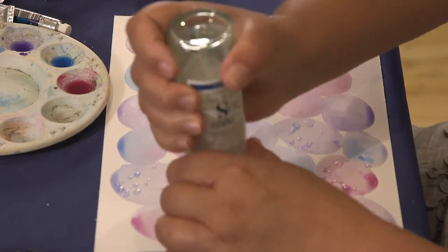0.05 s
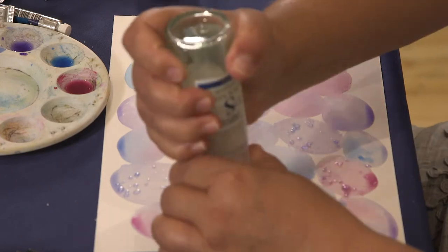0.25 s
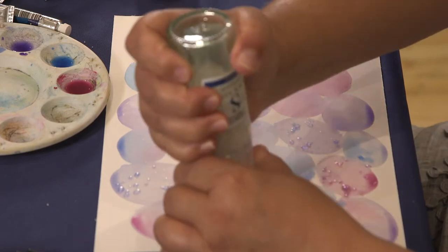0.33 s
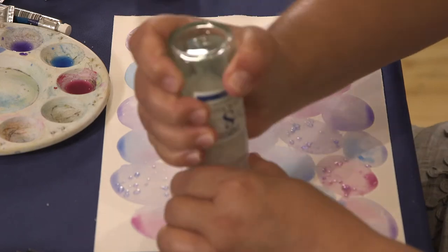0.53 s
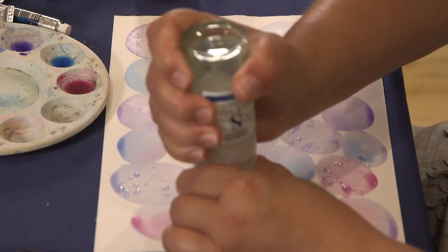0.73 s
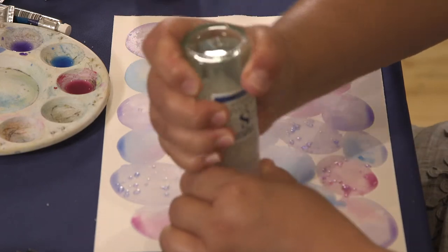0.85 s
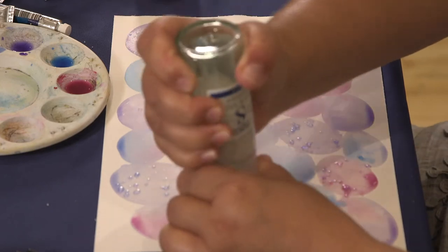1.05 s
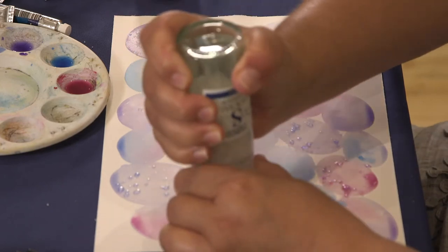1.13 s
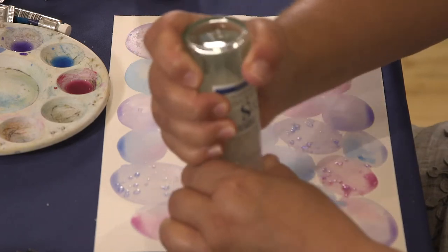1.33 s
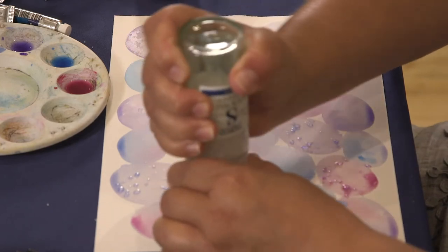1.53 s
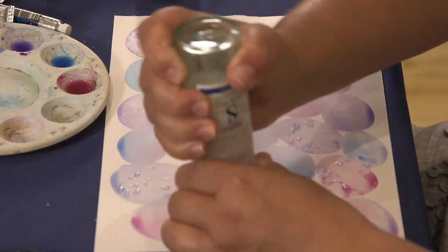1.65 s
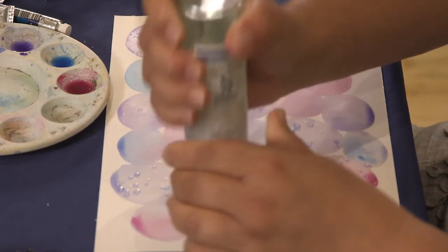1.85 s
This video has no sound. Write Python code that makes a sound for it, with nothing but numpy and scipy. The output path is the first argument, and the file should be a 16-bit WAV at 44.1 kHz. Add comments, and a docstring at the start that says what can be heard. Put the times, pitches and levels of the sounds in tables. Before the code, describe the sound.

Coarse salt snaps and crunches in a hand grinder, turn after turn, with gritty rubbing between the bursts and a light patter of falling grains, heard very close in a small indoor room.

```python
"""Salt crystals crack between the burrs of a mill in five bunches, close to the microphone in a small room.
Each crack is a noise burst ringing the mill, with a low thump made from a high-passed pressure step.
The burrs creak (uneven pulse trains), scrape and rub (swells and a bed of coloured grains).
Crushed salt hisses down onto paper as more coloured grains; a diffuse echo and a quiet floor lie behind."""
import sys
import numpy as np
from scipy import signal
from scipy.fft import rfft, irfft
from scipy.io import wavfile

SR = 44100
rng = np.random.default_rng(int(sys.argv[2]) if len(sys.argv) > 2 else 0)


def digitize_waveform(pressure):
    """Quantize a signal to 16-bit integers and store it at the path in sys.argv[1].

    Rows of a 2-D input are taken as channels; values are limited to [-1, 1].
    """
    field = np.atleast_2d(pressure).T
    bounded = np.clip(field, -1, 1)
    quanta = np.round(bounded * 32767).astype(np.int16)
    wavfile.write(sys.argv[1], SR, quanta)


N = 83790


def amp(db):
    """Amplitude ratio of a level in dB."""
    return 10 ** (np.asarray(db) / 20)


def unit(x):
    """Scale to an RMS of 1."""
    return x / np.sqrt(np.mean(x ** 2) + 1e-20)


def read(points, hz):
    """Interpolate a spectral table on a log-frequency axis."""
    f, value = np.transpose(points)
    return np.interp(np.log(hz + 1), np.log(f + 1), value)


def add(mix, start_s, sound):
    """Mix a sound in at its start time, cut at the end of the mix."""
    part = mix[max(round(start_s * SR), 0):][:len(sound)]
    part += sound[:len(part)]


def colour(x, gain_db, size=2048):
    """Causal minimum-phase filter whose gain in dB is a function of frequency."""
    hz = abs(np.fft.fftfreq(size, 1 / SR))
    log_gain = gain_db(hz) * np.log(10) / 20
    taps = np.fft.ifft(np.exp(np.conj(signal.hilbert(log_gain)))).real
    return signal.fftconvolve(x, taps)[:len(x)]


# Resonances of the mill. Each row: centre in Hz, full width at half the lift in Hz, lift in dB.
MILL_RESONANCES = [(2690, 900, 3), (4800, 900, 3), (8200, 900, 4), (10200, 900, 4), (12750, 1000, 6),
                   (15300, 700, 3)]
RING_LIFT_DB, RING_WIDTH_HZ = 9, 2200
FIRST_BREAK = 3.5  # height of the opening click, against noise of RMS 1
SNAP_DECAY_SHARE = 0.2  # decay time as a share of the fracture length
AFTER_DB, AFTER_DECAY_S = -17, 0.0025
TREBLE_FALL_DB_PER_KHZ = -0.08
DULL_FALL_PER_KHZ = 0.041  # extra fall per dB that the middle exceeds the treble
LEVEL_WINDOW_S = 0.0023  # band levels are RMS, with all the energy counted in this window
SNAP_BANDS_HZ = [(200, 1350), (1700, 6800), (6800, 16000)]
SNAP_FILTERS = [signal.butter(3, hz, "bandpass", fs=SR, output="sos") for hz in SNAP_BANDS_HZ]


def snap(length_ms, bass_db, middle_db, treble_db, ring_hz, size=768):
    """A fracture clicks open, crumbles as a brief noise burst and rings the well-damped mill."""
    t = np.arange(size) / SR
    length_s = length_ms / 1000
    crumble = np.exp(-np.maximum(t / length_s - 1, 0) / SNAP_DECAY_SHARE)
    after = amp(AFTER_DB) * np.exp(-t / AFTER_DECAY_S)
    burst = rng.standard_normal(size) * (crumble + after)
    burst[0] -= FIRST_BREAK

    peaks = MILL_RESONANCES + [(ring_hz, RING_WIDTH_HZ, RING_LIFT_DB)]
    dullness_db = max(middle_db - treble_db, 0)
    fall_db_per_hz = (TREBLE_FALL_DB_PER_KHZ + DULL_FALL_PER_KHZ * dullness_db) / 1000

    def ring_gain_db(hz):
        lift_db = sum(db / (1 + (2 * (hz - f) / width) ** 2) for f, width, db in peaks)
        return lift_db - fall_db_per_hz * hz

    burst = colour(burst, ring_gain_db, size=512)
    levels_db = (bass_db, middle_db, treble_db)
    bands = [amp(db) * unit(signal.sosfilt(sos, burst)) for db, sos in zip(levels_db, SNAP_FILTERS)]
    return np.sqrt(LEVEL_WINDOW_S * SR / size) * sum(bands)


THUMP_HZ, THUMP_DELAY_S = 24.8, 0.00094
RECOIL, RECOIL_S, SHARP_RISE_MS = 0.95, 0.00041, 0.96


def thump(rise_ms, size=8000, order=5):
    """The mill lurches: a pressure step, high-passed so it swings in deep bass; fast ones recoil more."""
    t = np.arange(size) / SR
    rise_s = rise_ms / 1000
    step = 0.5 + 0.5 * np.tanh((t - THUMP_DELAY_S - rise_s) / rise_s)
    sharpness = min(SHARP_RISE_MS / rise_ms, 1) ** 2
    pulse = (t / RECOIL_S) ** 2 * np.exp(1 - (t / RECOIL_S) ** 2)
    push = step - step[0] - RECOIL * sharpness * pulse
    swing = signal.sosfilt(signal.butter(order, THUMP_HZ, "highpass", fs=SR, output="sos"), push)
    return swing / abs(swing).max()


# Breaking crystals. Each row: start in seconds, length in ms, bass, middle and treble levels in dB,
# strongest ring in Hz, thump peak in dB, thump rise constant in ms.
CRYSTAL_CRACKS = [(.1000, 1.2, -73, -76, -55, 12800, -58, 2),
                  (.1210, 1.2, -57, -34.5, -40.5, 2160, -44.5, 1.4),
                  (0.1564, 1.5, -61, -65, -46, 11500, -55, 1.8),
                  (0.17, 2.6, -56, -47, -41.5, 10000, -51, 1.6),
                  (0.2136, 2.86, -46, -24.5, -22, 2000, -24, 0.73),
                  (0.252, 1.8, -53, -32, -41, 8200, -62, 2.2),
                  (0.2549, 0.84, -35, -32, -19.5, 9700, -21, 0.17),
                  (.2600, 1.14, -47, -28, -29, 2630, -49, 0.62),
                  (.2640, 1.4, -30.5, -23, -18.5, 8300, -22.5, 0.28),
                  (0.2771, 0.78, -35, -34.5, -43, 3300, -47, 1.3),
                  (0.2783, 4.4, -49, -42, -32, 11500, -50, 2.6),
                  (0.2839, 1.35, -54, -28, -25, 9100, -44, 2.2), (.2981, 1.2, -59, -34, -36, 2700, -63, 2),
                  (0.303, 0.99, -55, -46, -31.5, 8900, -49, 2),
                  (0.347, 0.98, -53, -42, -35, 11500, -46, 1.5),
                  (0.3543, 0.4, -59, -33, -38.5, 2830, -46, 2.7),
                  (0.5002, 1.2, -56, -41, -65, 2800, -60, 1.8),
                  (0.5135, 0.59, -54, -36.5, -54, 2200, -54, 2),
                  (0.5528, 2.9, -48, -31.5, -18, 10600, -29.5, 2.26),
                  (.5567, 1.6, -59, -35, -26, 10000, -41.5, 1.8),
                  (0.5925, 0.98, -45, -35, -27, 10200, -43, 1.2),
                  (0.5963, 2.4, -42, -34, -24, 3400, -39, 3),
                  (0.5982, 1.5, -46, -38, -22.5, 10100, -48, 1.3),
                  (0.6042, 0.98, -64, -24, -22.5, 3840, -35, 1.64),
                  (0.6325, 2.3, -56, -41, -45, 3600, -64, 2), (.8302, 1.8, -60, -54, -47.5, 9100, -54, 2.2),
                  (0.904, 1.95, -60, -34.5, -23.5, 11800, -32.5, 1.03),
                  (0.935, 1.64, -46, -31, -27.5, 4300, -42, 1.5),
                  (.9956, 1.14, -48, -31, -28, 4540, -37, 0.58),
                  (1.1084, 1.35, -47.5, -37, -44, 2160, -60, 1),
                  (1.1223, 3.1, -48, -35, -26, 9650, -36.5, 1.6),
                  (1.1284, 0.44, -58, -42, -54, 2600, -61, 2.3),
                  (1.154, 0.94, -40, -28.5, -29, 4230, -34.5, 0.58),
                  (1.1647, 1.5, -36, -44, -33, 1400, -40.5, 0.93),
                  (1.1900, 0.74, -57, -30, -29.5, 5200, -40, 1.9),
                  (1.1975, 2.34, -44, -24, -25, 5350, -34, 1.7),
                  (1.2362, 1.3, -66, -41, -43.5, 2960, -65, 1.4),
                  (1.2825, 0.91, -55, -47, -46.5, 9500, -58, 2.4),
                  (1.3526, 0.46, -55.5, -44, -59, 2400, -57, 2.3),
                  (1.3604, 1.64, -44.5, -38, -44, 2010, -60, 1.7),
                  (1.5311, 0.93, -46, -34.5, -46.5, 3300, -45, 1),
                  (1.5388, 4.8, -61, -42, -40.5, 10000, -63, 1.2),
                  (1.5454, 0.69, -45, -35, -44, 2280, -53, 1.8), (1.553, 4.8, -59, -40, -48, 5600, -52, 2),
                  (1.5707, 0.96, -57, -32, -37, 5350, -44, 2.1),
                  (1.5888, 1.04, -27, -34, -22, 1330, -18.5, 0.22),
                  (1.5905, 2.1, -42.5, -25, -20, 7960, -47, 0.71),
                  (1.5989, 1.2, -47, -43, -30, 10700, -46, 2.6),
                  (1.6021, 1.7, -43, -35.5, -20.5, 4570, -39, 2.9)]


def crystals():
    """Each crystal snaps and jolts the mill."""
    out = np.zeros(N)
    for start_s, *crack, thump_db, rise_ms in CRYSTAL_CRACKS:
        add(out, start_s, snap(*crack))
        add(out, start_s, amp(thump_db) * thump(rise_ms))
    return out


# Stick-slip of the burrs. Each row: start in seconds, length in seconds, slips per second, RMS in dB.
CREAK_RUNS = [(.338, 0.0714, 310, -48.5), (0.868, 0.039, 278, -50.5), (0.924, 0.022, 310, -50.5),
              (0.962, 0.032, 336, -49), (1.014, 0.0182, 180, -53.5), (1.403, 0.019, 114, -56)]
# Spectrum of a slip. Each row: frequency in Hz, relative gain in dB.
CREAK_SPECTRUM = [(100, -10), (400, 1), (900, 5.5), (1500, 0), (2900, 7.5), (3700, -10), (8000, -7.5),
                  (16000, -12)]
SLIP_JITTER, SLIP_SPREAD_DB = 0.16, 1.9  # jitter: spread of the log of the gap


def creaks(count=40):
    """Short runs of uneven stick-slip pulses as the burrs rub."""
    out = np.zeros(N)
    for start_s, length_s, slips_per_s, level_db in CREAK_RUNS:
        gap, size = rng.standard_normal((count, 2)).T
        times_s = np.cumsum(np.exp(SLIP_JITTER * gap)) / slips_per_s
        inside = times_s < length_s
        slips = np.zeros(round(length_s * SR) + 1)
        slips[(times_s[inside] * SR).astype(int)] = amp(SLIP_SPREAD_DB * size[inside])
        padded = np.r_[slips, np.zeros(200)]  # room for the filter to ring out
        creak = colour(padded, lambda hz: read(CREAK_SPECTRUM, hz))
        add(out, start_s, amp(level_db) * unit(creak))
    return out


GRAINS_PER_S, GRAIN_SPREAD_DB = 13000, 3.5


def grains():
    """A dense patter of impacts of uneven size and random sign."""
    size = amp(GRAIN_SPREAD_DB * np.minimum(rng.exponential(1, N), 5))
    hits = rng.random(N) < GRAINS_PER_S / SR
    return size * rng.choice([-1, 1], N) * hits


# Powder between the burrs. Each row: middle in seconds, half length (to 1/e) in seconds, level in dB.
SCRAPE_SWELLS = [(0.179, 0.067, -54.5), (0.27, 0.026, -43), (0.31, 0.014, -41), (0.353, 0.022, -45.5),
                 (0.605, 0.006, -39), (0.893, 0.0065, -52), (0.914, .018, -47), (.988, 0.0055, -36.5),
                 (1.007, 0.0038, -46.5), (1.159, 0.031, -47.5), (1.376, 0.0091, -47), (1.626, 0.0028, -48)]
# Spectrum of the scrape. Each row: frequency in Hz, relative gain in dB.
SCRAPE_SPECTRUM = [(200, 2), (1000, -10), (2700, 0), (4800, 0.5), (6500, -2), (8200, -3), (10200, 5.5),
                   (11600, -5.5), (12800, -2), (14500, -9), (16000, -7)]


def scrapes():
    """Gritty swells of powder ground between the burrs: coloured grains under Gaussian envelopes."""
    t = np.arange(N) / SR
    level = sum(amp(db) * np.exp(-((t - mid_s) / half_s) ** 2) for mid_s, half_s, db in SCRAPE_SWELLS)
    return level * unit(colour(grains(), lambda hz: read(SCRAPE_SPECTRUM, hz)))


def patter(levels, spectrum):
    """Coloured grains that follow a level curve."""
    level = amp(np.interp(np.arange(N) / SR, *np.transpose(levels)))
    return level * unit(colour(grains(), lambda hz: read(spectrum, hz)))


# Level of the rubbing. Each row: time in seconds, level in dB.
RUB_LEVEL = [(0, -71), (.2, -62), (.3, -46.5), (.39, -52.5), (.46, -56.5), (.56, -54.5), (.67, -52),
             (.82, -58.5), (.95, -55), (1.07, -60.5), (1.25, -56.5), (1.45, -59), (1.6, -58.5),
             (1.9, -62.5)]
# Spectrum of the rubbing. Each row: frequency in Hz, relative gain in dB.
RUB_SPECTRUM = [(60, 2), (200, -7), (450, -2), (900, 0), (1500, -4), (2800, -0.5), (4500, -11), (9000, -37),
                (16000, -24)]


def rubbing_burrs():
    """The burrs rub as the mill turns: many small contacts, weak in the treble."""
    return patter(RUB_LEVEL, RUB_SPECTRUM)


# Level of the falling salt. Each row: time in seconds, level in dB.
FALL_LEVEL = [(0, -64), (.2, -77), (.28, -50), (.42, -50), (.54, -55.5), (.63, -49), (0.848, -58),
              (1.001, -52.5), (1.1, -58.5), (1.21, -53.5), (1.35, -54.5), (1.499, -64), (1.58, -55),
              (1.62, -45.5), (1.75, -49.5), (1.9, -57)]
# Spectrum of the falling salt. Each row: frequency in Hz, relative gain in dB.
FALL_SPECTRUM = [(200, -21), (1000, -18), (2600, -14), (4300, 7), (6500, 1.5), (8400, 2), (11700, 0),
                 (16000, -15)]


def falling_salt():
    """Crushed salt hits the paper: many small impacts, strongest near 4 kHz."""
    return patter(FALL_LEVEL, FALL_SPECTRUM)


# Decay of the room. Each row: frequency in Hz, time to fall 60 dB in seconds.
ROOM_DECAY = [(200, .5), (800, 0.99), (2100, 0.74), (5500, 1.28), (10000, 0.63), (15000, 0.87)]
# Spectrum of the echo. Each row: frequency in Hz, gain in dB.
ROOM_SPECTRUM = [(50, -20), (250, -31), (800, -19), (2500, -15), (4800, -15), (8000, -17), (11000, -17),
                 (16000, -21)]


def room(x, build_s=0.0059):
    """A diffuse noise tail that builds quickly, each band dying at its own speed."""
    hz, t, noise = signal.stft(rng.standard_normal(SR), SR, nperseg=256)
    t60_s = read(ROOM_DECAY, hz)[:, None]
    envelope = amp(-60 * t / t60_s) * (1 - np.exp(-t / build_s))
    tail = signal.istft(noise * envelope, SR, nperseg=256)[1]
    echo = signal.fftconvolve(x, tail / np.linalg.norm(tail))[:N]
    return colour(echo, lambda hz: read(ROOM_SPECTRUM, hz))


# Spectrum of the quiet room. Each row: frequency in Hz, relative gain in dB.
FLOOR_SPECTRUM = [(20, 10.5), (45, 12), (75, 13.5), (110, 2), (250, 1.5), (600, -10.5), (1500, -22),
                  (4000, -22), (10000, -38.5), (16000, -18)]
FLOOR_DB = -64


def floor():
    """Quiet rumble and hiss of the room: steady noise shaped in frequency."""
    gain = amp(read(FLOOR_SPECTRUM, np.fft.rfftfreq(N, 1 / SR)))
    noise = irfft(rfft(rng.standard_normal(N)) * gain, N)
    return amp(FLOOR_DB) * unit(noise)


def scene():
    """The mill and its echo, the rubbing burrs, the falling salt and the quiet room."""
    mill = crystals() + creaks() + scrapes()
    mix = mill + room(mill) + rubbing_burrs() + falling_salt() + floor()
    return mix[None]


EDGE_HZ = 15950


def record(dry):
    """The band limit of the recorder: a steep linear-phase low-pass."""
    taps = signal.firwin(255, EDGE_HZ, window=("kaiser", 8), fs=SR)
    return signal.oaconvolve(dry, taps[None], "same")


dry = scene()
out = record(dry)
digitize_waveform(out)
```